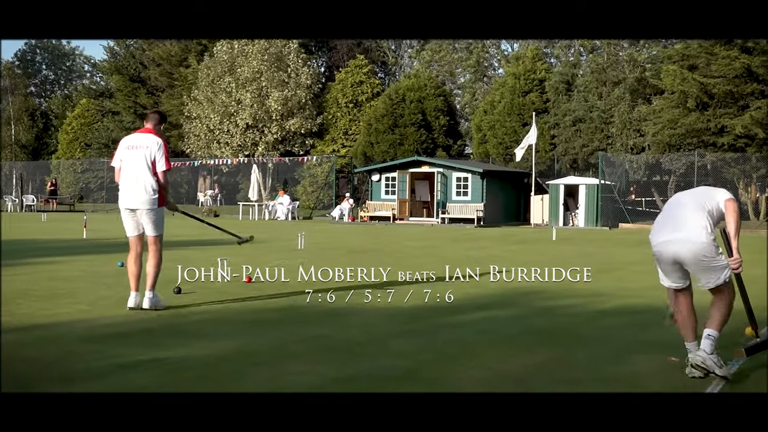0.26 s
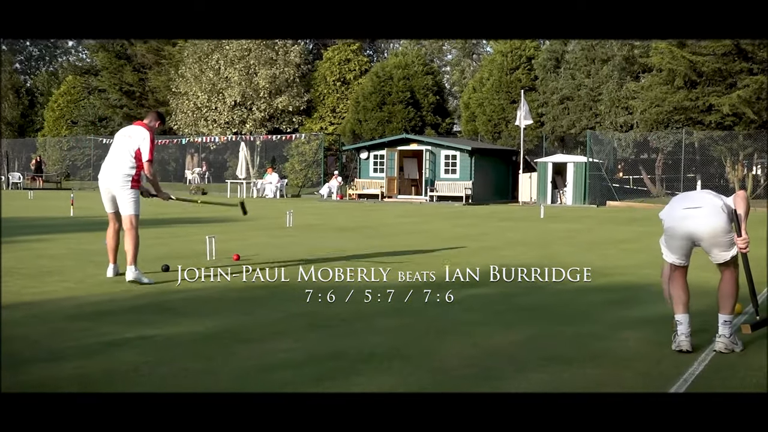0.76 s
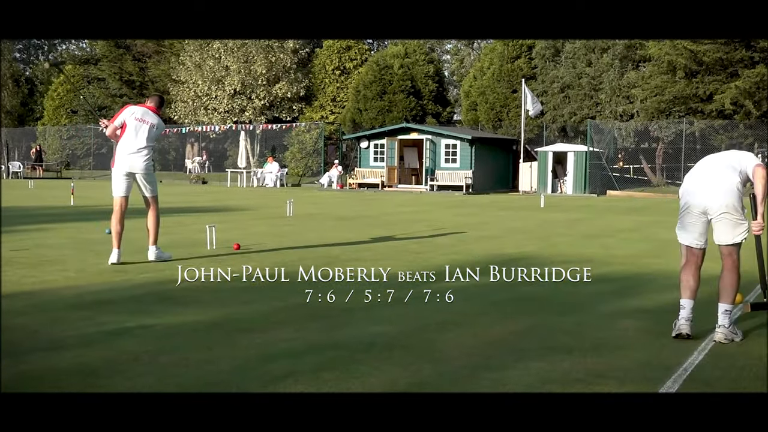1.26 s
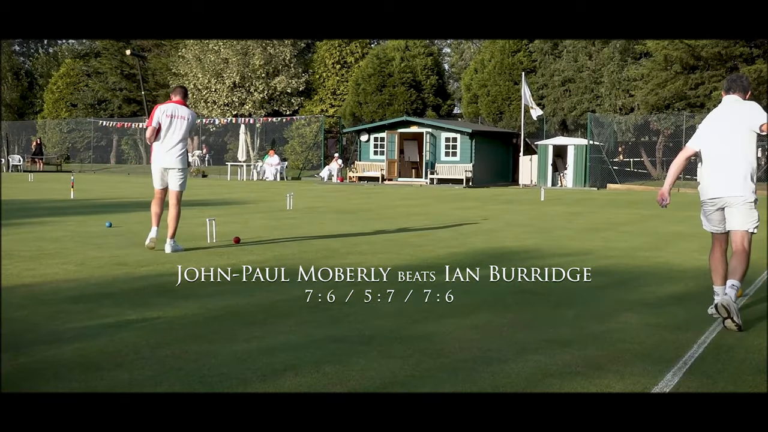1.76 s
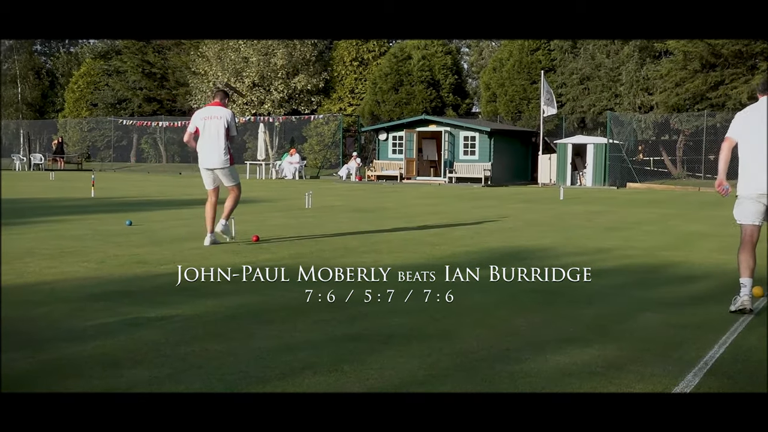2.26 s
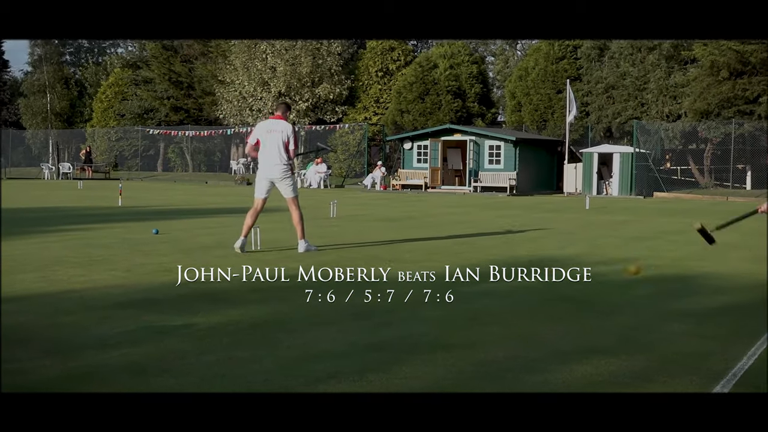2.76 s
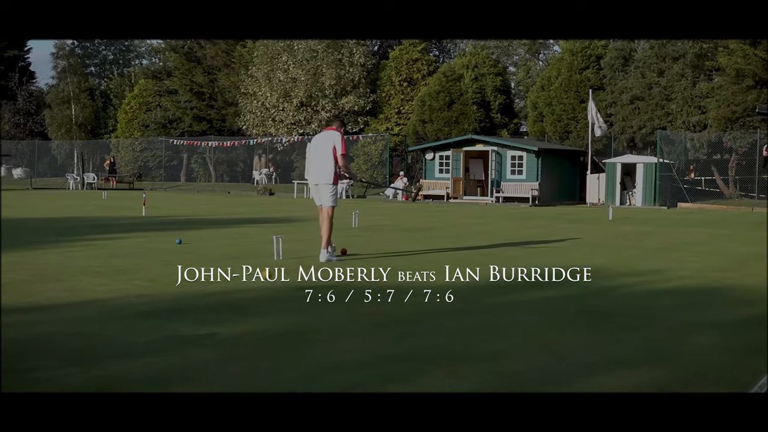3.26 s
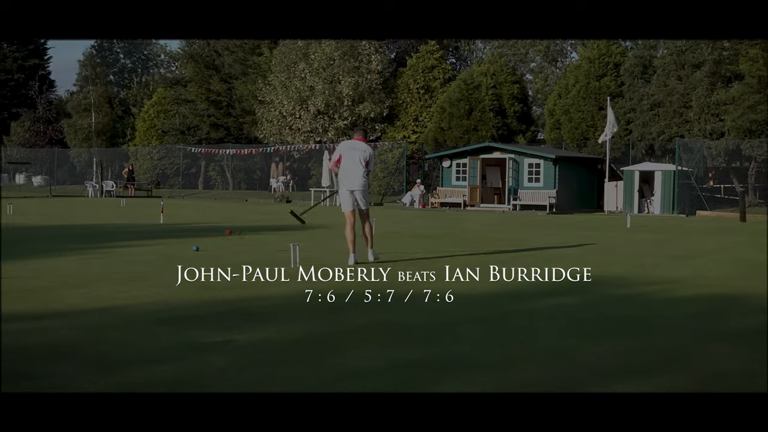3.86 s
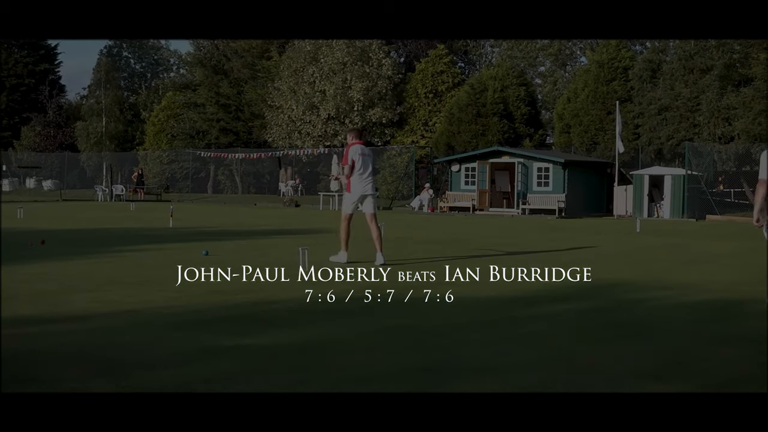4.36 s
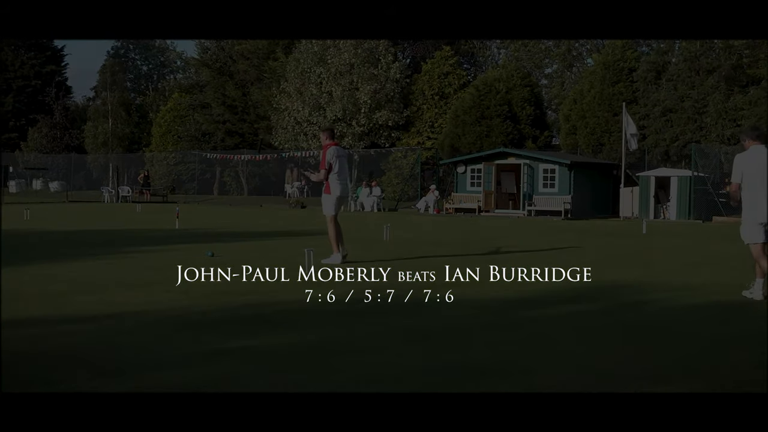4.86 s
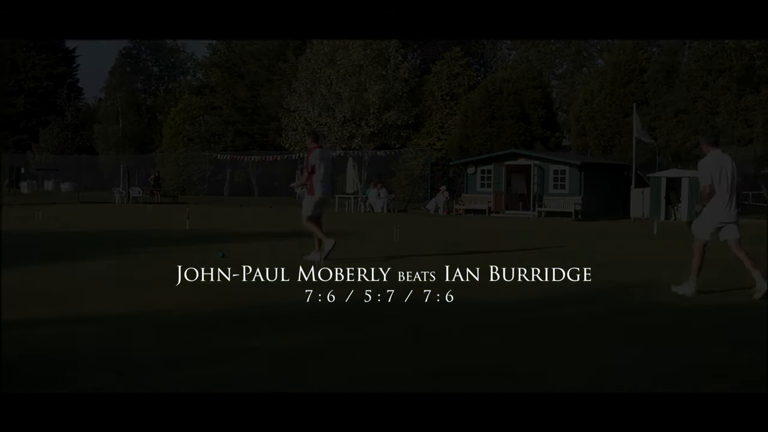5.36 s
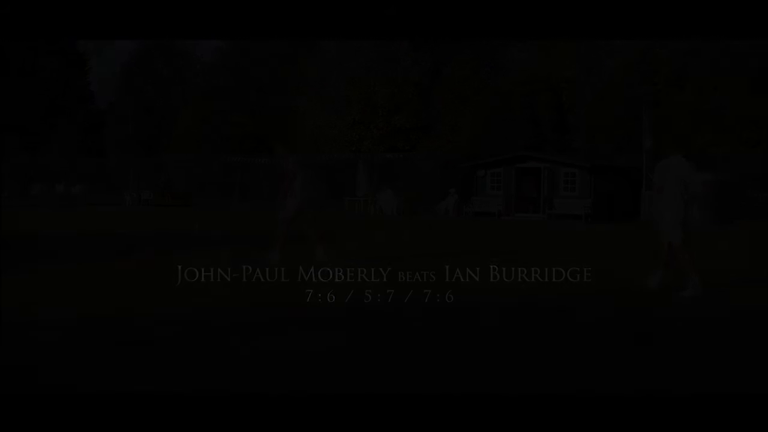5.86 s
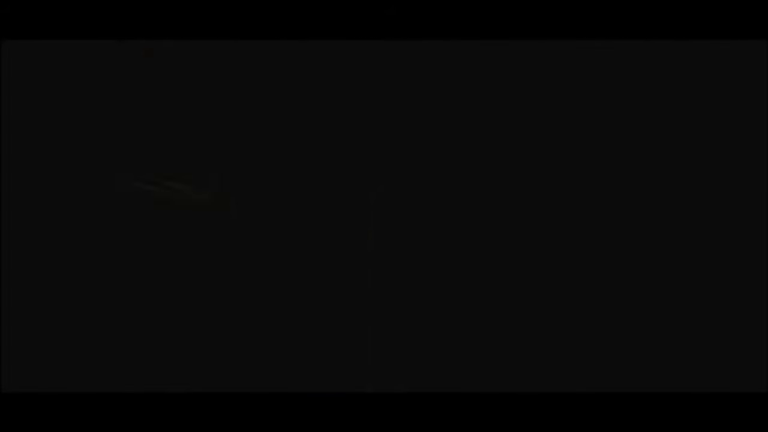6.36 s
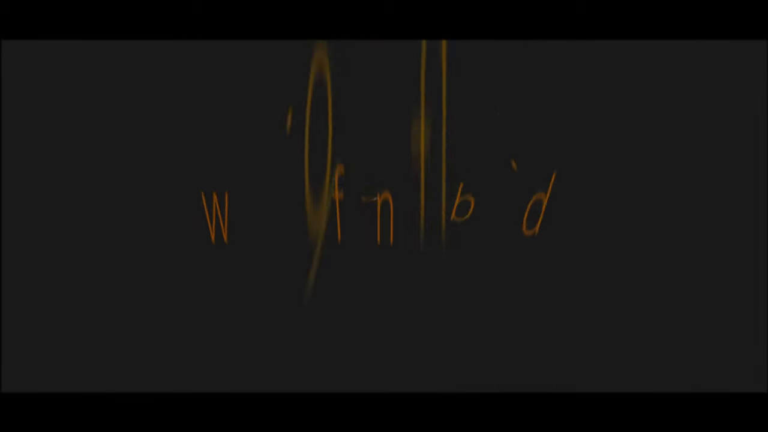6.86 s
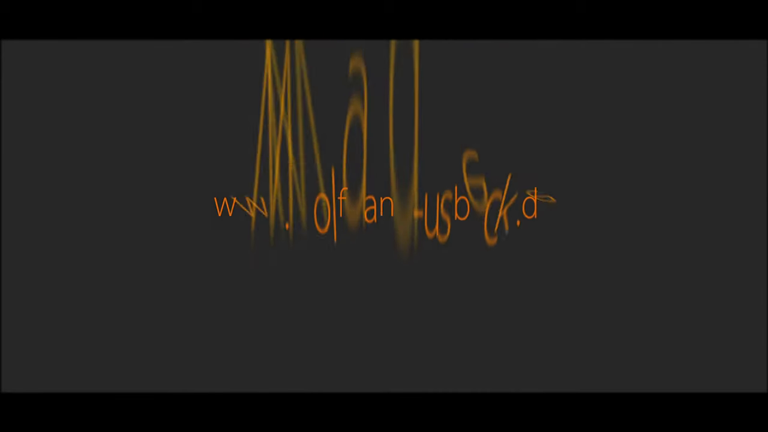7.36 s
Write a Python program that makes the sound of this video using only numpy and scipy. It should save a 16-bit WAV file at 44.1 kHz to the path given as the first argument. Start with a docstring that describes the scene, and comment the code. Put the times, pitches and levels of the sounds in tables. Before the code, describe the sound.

An outdoor lawn heard almost entirely on the right channel, with only fading hiss and faint leakage on the left. A soft wash of distant traffic and leaves lies under light wind rumble. At about 1.0 s a mallet hits a hard ball with a loud, sharp crack, a dead woody knock and brief ringing notes, answered faintly by fence, trees and a distant wall. From about 2.5 s strong gusts flutter and thump against the microphone; at 2.7 s comes a higher, drier clack with a small turf bump. The wash drops slightly. Around 3.6 s a soft thud precedes another hollow ringing stroke at 3.7 s. Gusts continue to about 4.9 s, lull, then return more weakly near 6.0-6.4 s. At 6.5 s a much gentler, duller knock sounds, followed by a very faint thud at 6.8 s. Sparse tiny ticks and scuffs occur throughout; the air quietens toward 7.6 s.

```python
"""Croquet on an open lawn

Wooden mallets strike hard balls four times: a click, a dead knock and two ringing notes, with faint
answers from fence, trees and a wall. Soft thuds and ticks are short bursts of resonant noise.
Gusts buffet the microphone as uneven low noise, over a fading noise wash of far traffic and leaves.
The microphone feeds the right channel; the left carries only fading hiss and a trace of crosstalk."""
import sys
import numpy as np
from scipy import signal
from scipy.fft import rfft, irfft, next_fast_len
from scipy.io import wavfile
from scipy.ndimage import uniform_filter1d, map_coordinates

SR = 44100
rng = np.random.default_rng(int(sys.argv[2]) if len(sys.argv) > 2 else 0)


def persist_wave(psi):
    """Save psi, clipped to +-1, as 16-bit WAV."""
    counts = np.round(np.clip(psi, -1, 1) * 32767).astype(np.int16)
    wavfile.write(sys.argv[1], SR, np.atleast_2d(counts).T)


N = 335404  # length in samples


def amp(db):
    """Decibels to gain."""
    return 10 ** (np.asarray(db) / 20)


def unit(x):
    """Scale to rms 1."""
    return x / np.sqrt(np.mean(x ** 2) + 1e-20)


def along(points, hz):
    """Read (Hz, value) points on a logarithmic frequency axis."""
    point_hz, values = np.transpose(points)
    return np.interp(np.log(hz + 1), np.log(point_hz + 1), values)


def curve(rows, size=N):
    """Join (seconds, value) rows by straight lines, one value per sample."""
    return np.interp(np.arange(size) / SR, *np.transpose(rows))


def wobble(rate):
    """A smooth curve through random knots, rate knots a second."""
    knots = rng.standard_normal(int(N * rate / SR) + 4)
    return map_coordinates(knots, [np.arange(N) * rate / SR])


def filtered(x, response):
    """Multiply the spectrum of x by a response of frequency; padding keeps the end off the start."""
    size = next_fast_len(len(x) + SR // 4)
    spectrum = rfft(x, size) * response(np.fft.rfftfreq(size, 1 / SR))
    return irfft(spectrum, size)[:len(x)]


def noise(spectrum):
    """Random noise coloured by (Hz, dB) points, at rms 1."""
    return unit(filtered(rng.standard_normal(N), lambda hz: amp(along(spectrum, hz))))


def pulse(spectrum, size):
    """A pulse with this spectrum and its energy as early as possible (minimum phase)."""
    log_gain = np.log(amp(along(spectrum, np.fft.rfftfreq(size, 1 / SR))))
    cepstrum = irfft(log_gain, size)
    # fold the half before time zero onto the half after it
    cepstrum[1:size // 2] *= 2
    cepstrum[size // 2 + 1:] = 0
    return irfft(np.exp(rfft(cepstrum)), size)


def ringing(modes, t):
    """Sum damped sines, each 60 dB down after its t60; neighbours swing in opposite directions."""
    total = np.zeros(len(t))
    for k, (hz, db, t60) in enumerate(modes):
        total += (-1) ** k * amp(db - 60 * t / t60) * np.sin(2 * np.pi * hz * t)
    return total


def add(track, s, sound):
    """Mix a sound into the track at s seconds, cut off at the track's end."""
    part = track[round(s * SR):][:len(sound)]
    part += sound[:len(part)]


def eddies(spectrum, size):
    """Turbulent pressure: coloured noise whose swings are evened out over size samples."""
    swirl = noise(spectrum)
    local_power = np.abs(uniform_filter1d(swirl ** 2, size=size))
    return swirl / np.sqrt(local_power + .05)


# Colour of the large eddies. Each row: frequency in Hz, relative level in dB.
RUMBLE = [(10, -11.5), (28, 0.5), (50, 3), (85, -2), (120, -11.5), (200, -29.5), (320, -28), (600, -65),
          (2000, -110)]
# Colour of the small eddies. Each row: frequency in Hz, relative level in dB.
FLUTTER = [(50, -27), (110, 1.5), (170, -2.5), (250, -11), (380, -22), (700, -34.5), (3000, -82)]
# The breeze under the gusts. Each row: time in seconds, level in dB before the shifts in wind().
BREEZE = [(0.0, -58.5), (0.65, -53.5), (0.85, -61), (1.37, -59), (1.63, -57), (2.03, -57), (2.52, -44.5),
          (3.47, -48.5), (3.7, -51), (3.87, -46.5), (4.13, -41), (5.54, -56.5), (5.78, -59), (6.16, -47),
          (6.54, -50.5), (6.82, -64.5), (7.32, -57.5), (7.6, -67)]
# Gusts that strike the microphone. Each row: peak time in seconds, level in dB before the lifts in
# wind(), time from the peak in seconds until the swing is 1/e, flutter against rumble in dB before lifts.
GUSTS = [(0.067, -45.5, .05, -8.5), (0.312, -49, .08, -10), (0.61, -48, .05, -15),
         (1.336, -45.5, 0.023, -8), (1.636, -40.5, 0.097, -10.5), (2.267, -39.5, 0.029, -3),
         (2.413, -40.5, 0.1, -19), (2.537, -27, 0.049, -6.5), (2.629, -30.5, 0.028, -11),
         (2.85, -33, 0.017, -20), (2.929, -24.5, 0.03, -15.5), (3.135, -40, 0.03, -4.5),
         (3.491, -36.5, 0.019, -16), (3.687, -30, 0.024, -2.5), (3.784, -32, 0.047, -4.5),
         (3.844, -27.5, 0.016, -7.5), (3.943, -34.5, 0.02, -20), (4.092, -33, 0.16, -9.5),
         (4.246, -34.5, 0.022, -12), (4.377, -41.5, 0.038, -1), (4.519, -35, 0.062, -8.5),
         (4.826, -31.5, 0.062, -12.5), (5.003, -46.5, 0.032, -19), (5.83, -50.5, .06, -4),
         (5.989, -39.5, 0.053, -1.5), (6.068, -37.5, 0.03, -7), (6.223, -35, 0.021, -11),
         (6.341, -34.5, 0.037, -2), (6.524, -43, 0.089, -4), (6.698, -47.5, .07, -6),
         (7.332, -52, 0.12, -26)]


def wind(breeze_db=-0.5, breeze_flutter_db=-6.5, rumble_db=5.5, flutter_db=4.0, lumps_db=3.5, sway_db=3.0):
    """Large eddies rumble and small ones flutter; each gust swells and dies on top of the breeze."""
    t = np.arange(N) / SR
    swaying_db = curve(BREEZE) + breeze_db + sway_db * wobble(19)
    large_power = amp(swaying_db) ** 2
    small_power = amp(swaying_db + breeze_flutter_db) ** 2
    for s, db, length, small_db in GUSTS:
        gust_power = amp(db) ** 2 * np.exp(-2 * ((t - s) / length) ** 2)
        large_power += gust_power
        small_power += gust_power * amp(small_db) ** 2
    rumble = np.sqrt(large_power) * amp(rumble_db) * eddies(RUMBLE, size=2400)
    lumpy_gain = amp(flutter_db + lumps_db * wobble(35))
    flutter = np.sqrt(small_power) * lumpy_gain * eddies(FLUTTER, size=1500)
    return rumble + flutter


# Colour of far traffic and leaves. Each row: frequency in Hz, relative level in dB.
WASH = [(20, -23), (150, -6.5), (270, -1.5), (400, -4), (650, -1), (950, 1.5), (1400, -3.5), (2200, -12),
        (3200, -18), (4400, -23.5), (7000, -28.5), (11000, -35.5), (15300, -41.5), (16300, -66)]
# How the wash fades. Each row: time in seconds, level in dB before the lift in wash().
WASH_LEVEL = [(0.0, -51), (0.93, -51.5), (2.64, -54), (2.9, -59), (3.22, -58.5), (3.68, -55.5), (4.04, -59),
              (5.1, -59), (5.37, -57.5), (6.58, -58.5), (7.6, -61)]


def wash(level_db=6.5, sway_db=1.2):
    """Far traffic and leaves: coloured noise that sways a little."""
    gain = amp(curve(WASH_LEVEL) + level_db + sway_db * wobble(8.8))
    return gain * noise(WASH)


def puffs(rows, sharpness, attack):
    """Contacts that do not ring: short noises in one broad resonance; attack is in seconds."""
    out, t = np.zeros(N), np.arange(SR // 4) / SR
    for s, db, centre_hz, t60 in rows:
        def resonance(hz):
            damping = 1j * hz * centre_hz
            return damping / (sharpness * (centre_hz ** 2 - hz ** 2) + damping)
        rub = unit(filtered(rng.standard_normal(len(t)), lambda hz: resonance(hz) ** 2))
        add(out, s, rub * amp(db - 60 * t / t60) * (1 - np.exp(-t / attack)))
    return out


# Faint scuffs and ticks. Each row: start in seconds, level in dB, centre in Hz, t60 in seconds.
TICKS = [(.41, -61, 9000, 0.4), (.735, -52, 5500, .035), (2.506, -51, 10000, 0.028), (2.59, -58, 9500, .02),
         (2.739, -49, 6500, 0.1), (4.208, -54, 5730, 0.034), (4.838, -57, 8500, .025)]


def ticks():
    """Faint scuffs: bursts of noise around a high centre frequency."""
    return puffs(TICKS, sharpness=1.4, attack=0.002)


# Colour of the sound scattered by leaves and fence. Each row: frequency in Hz, level in dB.
FOLIAGE = [(100, 7.5), (600, -1), (1200, -5), (2500, -0.5), (4000, 2), (7000, -4.5), (10000, -15),
           (16000, -10)]


def surroundings(sound, arrivals):
    """Diffuse return from many small surfaces: random reflections spread over their delays."""
    size = len(sound)
    scatter = unit(rng.standard_normal(size) * amp(curve(arrivals, size=size)))
    tail = scatter / np.sqrt(size)  # total energy 1
    coloured = signal.fftconvolve(tail, pulse(FOLIAGE, size=1024))
    return signal.fftconvolve(sound, coloured)[:size]


# The ball's hard shell. Each row: frequency in Hz, level in dB before the snap level, t60 in seconds.
SNAP = [(3850, 3, 0.005), (4540, 2.5, 0.0032)]
# Colour of the contact click. Each row: frequency in Hz, level in dB before the click level.
CLICK = [(100, -12), (1500, -4), (5000, -2), (8000, -1.5), (12000, -.5), (13500, -9), (16500, -17)]
# What the fence sends back. Each row: delay in seconds, relative level in dB.
FENCE = [(0, 12.5), (.013, -2), (0.026, -1), (.05, -10.5), (.072, -8), (.095, -39), (.2, -66)]
# What the trees send back. Each row: delay in seconds, relative level in dB.
TREES = [(.118, -62), (0.124, 0), (.155, 5.5), (.178, -9), (.195, 3.5), (.214, -4), (.228, 3.5), (.245, -6),
         (.3, -7), (.45, -50)]


def strokes(rows, head, body_t60, ring_t60, build_s=0.0011, crackle_db=-25, crackle_t60=0.011):
    """Mallet on ball: a contact click, a dead knock, and two notes that ring on."""
    out, t = np.zeros(N), np.arange(SR // 2) / SR
    for s, knock_db, body_hz, body_db, ring_hz, ring_db, snap_db, click_db, fence_db, trees_db, echo_s, echo_db in rows:
        # a gentle blow stays longer in contact and sounds lower
        stiffness = amp(.06 * knock_db)
        knock = amp(knock_db) * ringing(head, stiffness * t)
        snap = amp(snap_db) * ringing(SNAP, t)
        notes = ringing([(body_hz, body_db, body_t60), (ring_hz, ring_db, ring_t60)], t)
        swell = 1 - np.exp(-t / build_s)  # the notes build up while the ball leaves the face
        # the milled surface of the ball roughens the first contact
        crackle = amp(crackle_db - 60 * t / crackle_t60) * rng.standard_normal(len(t))
        contact = (t == 0) + crackle
        click = signal.fftconvolve(contact, pulse(CLICK, size=1024))[:len(t)]
        hit = knock + snap - swell * notes + amp(click_db) * click
        fence = amp(fence_db) * surroundings(hit, FENCE)
        trees = amp(trees_db) * surroundings(hit, TREES)
        add(out, s, hit + fence + trees)
        # one distinct, duller slap from a distant wall
        slap = filtered(hit, lambda hz: 1 / (1 + 1j * hz / 3500) ** 3)
        add(out, s + echo_s, amp(echo_db) * slap)
    return out


# Strokes of the far player. Each row: start in seconds, knock level in dB, body note in Hz, its level
# in dB, ring note in Hz, its level in dB, then levels in dB of snap, click, fence and trees,
# the wall echo's delay in seconds and its level in dB.
FAR_STROKES = [(0.9960, 1, 1080, -12, 2923, -20, -20, 1, -12, -27.5, .066, -21.5),
               (3.7352, -3, 1042, -12, 2945, -22, -16, -8, -15, -25, .057, -28),
               (6.5258, -13, 1093, -21, 3010, -43, -28, -34, -14.5, -25, .027, -19)]
# Dead knock of the far mallet's head, before the knock level bends pitch and decay.
# Each row: frequency in Hz, level in dB before the knock level, t60 in seconds.
FAR_HEAD = [(503, -5.5, 0.0026), (938, 6.5, 0.0052), (1119, 2.5, 0.012), (1406, -10, 0.01),
            (2324, -45, 0.0015)]


def far_player():
    """Three strokes with the longer-ringing notes."""
    return strokes(FAR_STROKES, FAR_HEAD, body_t60=0.049, ring_t60=0.074)


# The stroke of the near player. The row lists the same things as the far strokes.
NEAR_STROKES = [(2.7240, -1, 1443, -10.5, 3235, -15.5, -19, -11, -16, -27, .067, -35)]
# Dead knock of the near mallet's head. Each row lists the same things as the far head.
NEAR_HEAD = [(1060, 1.5, 0.006), (1366, 3, 0.006), (2374, -13, 0.013), (2520, -13.5, 0.0079),
             (10600, -31, 0.0092)]


def near_player():
    """One stroke with higher notes that die sooner."""
    return strokes(NEAR_STROKES, NEAR_HEAD, body_t60=.032, ring_t60=.011)


# Soft contacts of mallet and ball with the turf, before the treble is taken away.
# Each row: start in seconds, level in dB, frequency in Hz, t60 in seconds.
THUDS = [(2.737, -28.5, 720, 0.056), (2.751, -32.5, 595, 0.019), (3.609, -32, 440, 0.058),
         (3.6125, -21.5, 706, 0.022), (6.791, -47.5, 397, 0.37)]


def thuds(soft_hz=2200, crush_db=-4):
    """A damped bump with a puff of crushed grass; the turf takes away the treble."""
    out = amp(crush_db) * puffs(THUDS, sharpness=1.0, attack=0.00055)
    t = np.arange(SR // 4) / SR
    for s, db, hz, t60 in THUDS:
        add(out, s, ringing([(hz, db, t60)], t))
    return filtered(out, lambda hz: 1 / (1 + 1j * hz / soft_hz))


def scene():
    """Everything that reaches the microphone, on the right channel; the left is silent."""
    right = wind() + wash() + ticks() + far_player() + near_player() + thuds()
    return np.array([np.zeros(N), right])


# Colour of the left channel's hiss. Each row: frequency in Hz, relative level in dB.
HISS = [(20, -12), (120, 2), (500, 1.5), (1500, -2), (5000, -4), (15300, -5), (16300, -32)]
# How much of the right channel leaks into the left. Each row: frequency in Hz, gain in dB.
CROSSTALK = [(20, -18), (45, -33.5), (90, -40), (180, -50), (1000, -56), (2500, -36), (16000, -37)]


def record(dry, hiss_start_db=-74, hiss_middle_db=-78, hiss_end_db=-84, top_hz=16850):
    """The input clips at 0.95; the left gets fading hiss and crosstalk; both stop at top_hz."""
    right = np.clip(dry[1], -.95, .95)
    hiss_level = curve([(0, hiss_start_db), (5, hiss_middle_db), (7.6, hiss_end_db)])
    hiss = amp(hiss_level) * noise(HISS)
    crosstalk = filtered(right, lambda hz: amp(along(CROSSTALK, hz)))
    left = dry[0] + hiss + crosstalk
    return np.array([filtered(channel, lambda hz: hz < top_hz) for channel in (left, right)])


dry = scene()
out = record(dry)
persist_wave(out)
```